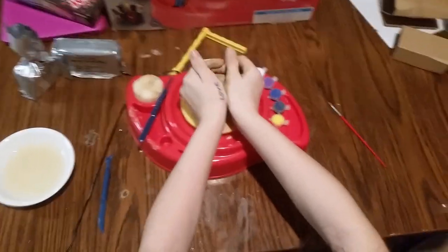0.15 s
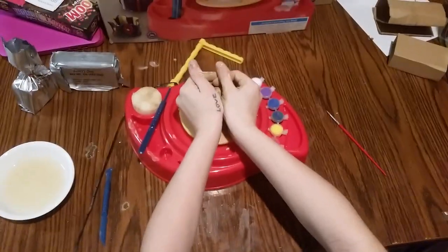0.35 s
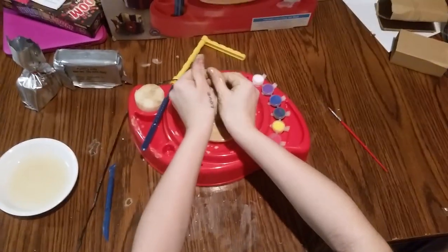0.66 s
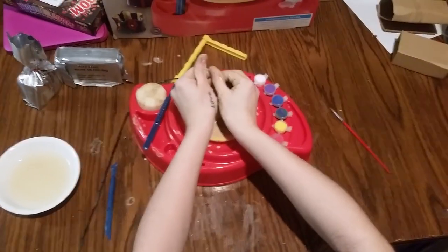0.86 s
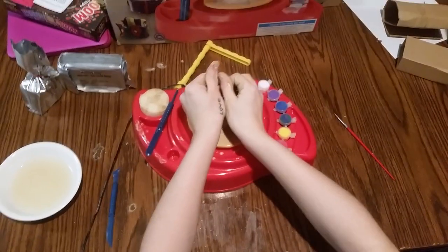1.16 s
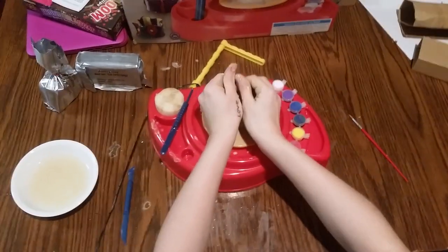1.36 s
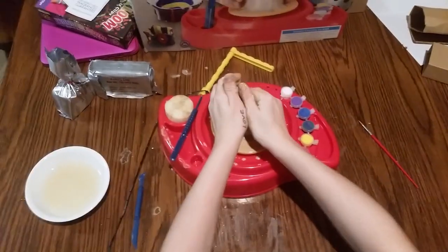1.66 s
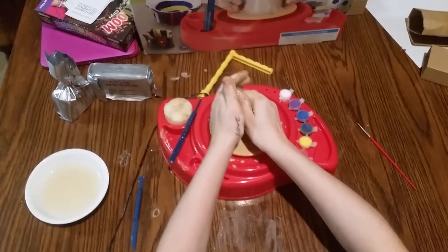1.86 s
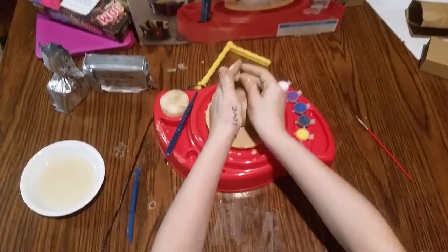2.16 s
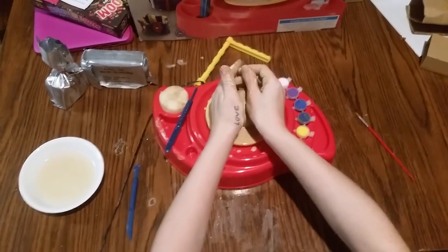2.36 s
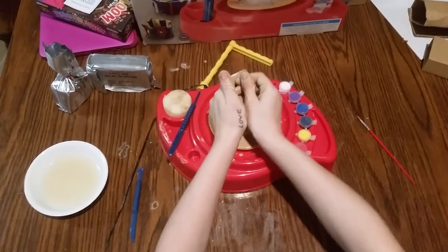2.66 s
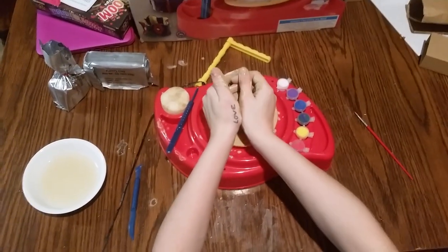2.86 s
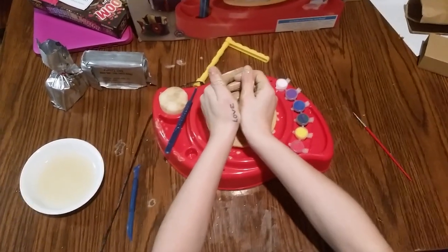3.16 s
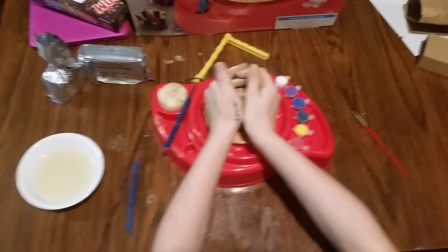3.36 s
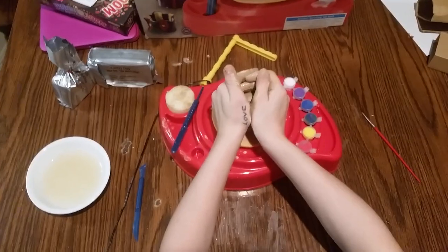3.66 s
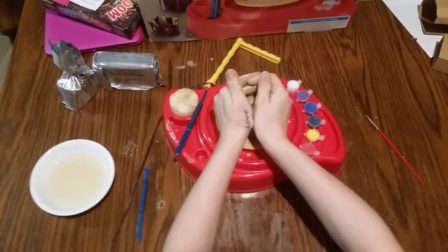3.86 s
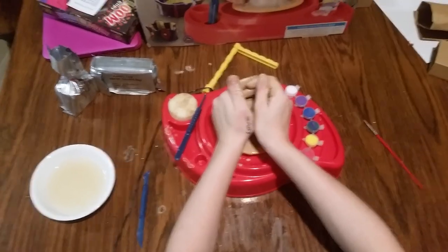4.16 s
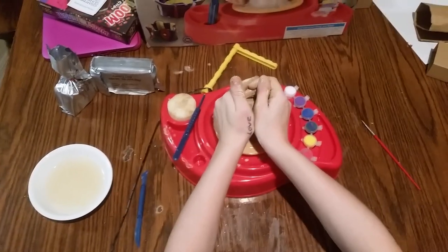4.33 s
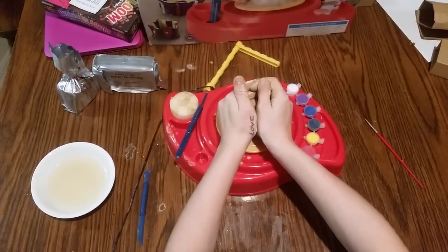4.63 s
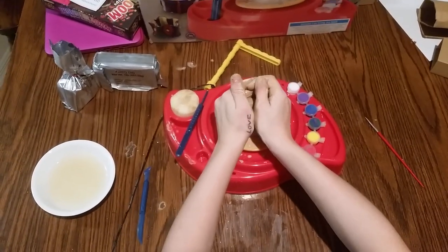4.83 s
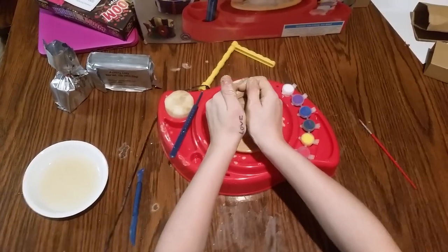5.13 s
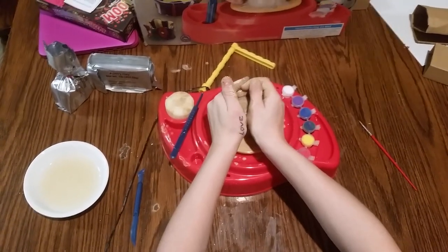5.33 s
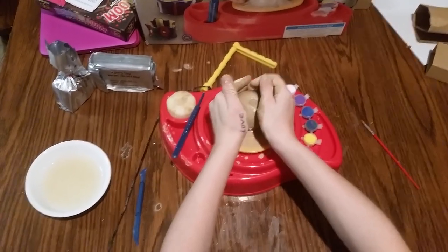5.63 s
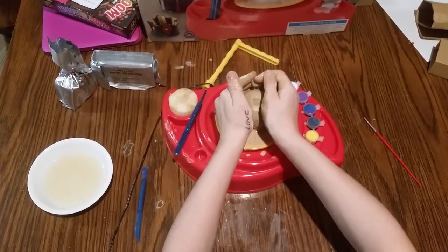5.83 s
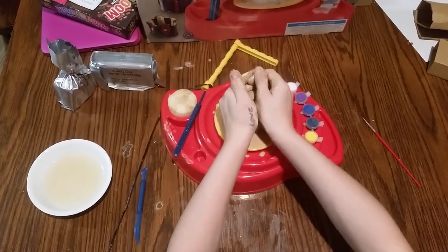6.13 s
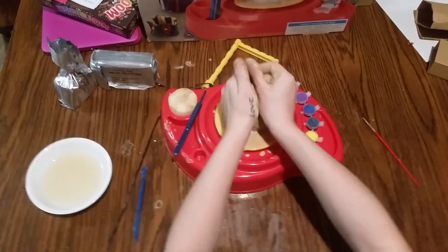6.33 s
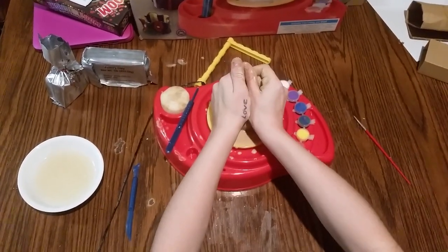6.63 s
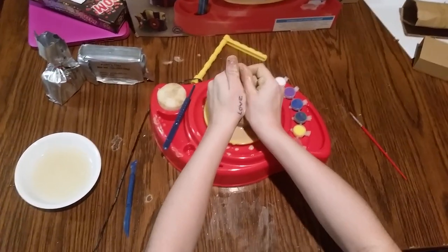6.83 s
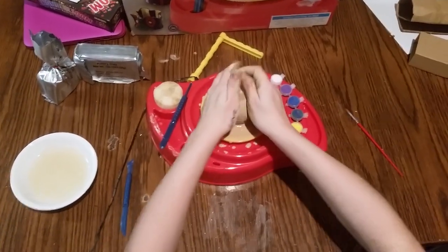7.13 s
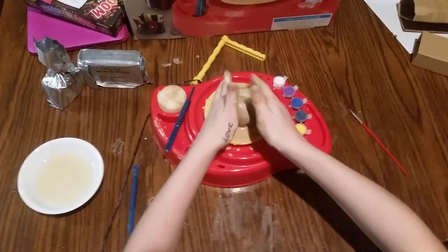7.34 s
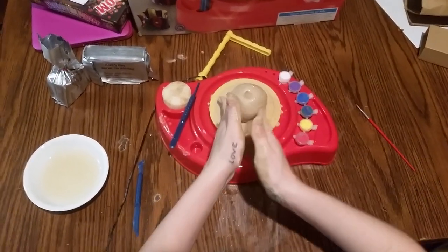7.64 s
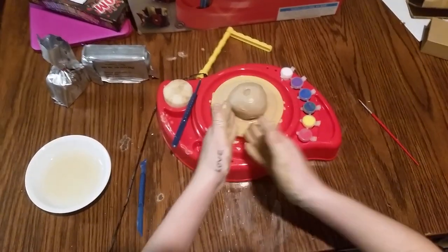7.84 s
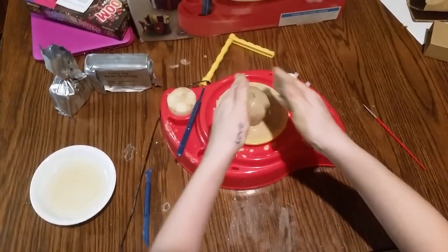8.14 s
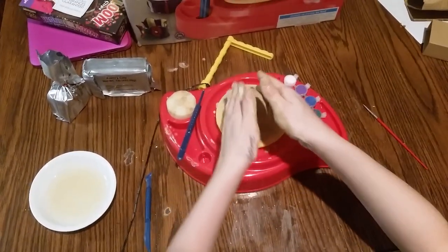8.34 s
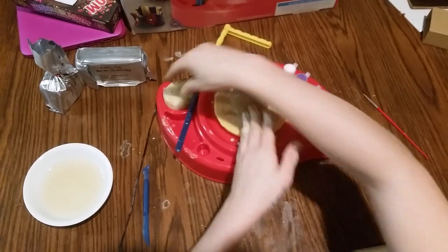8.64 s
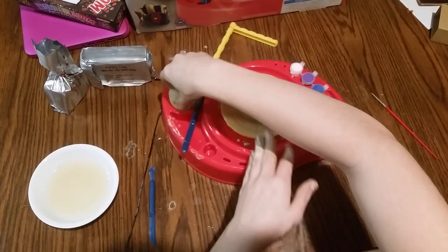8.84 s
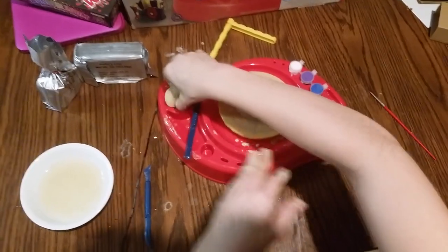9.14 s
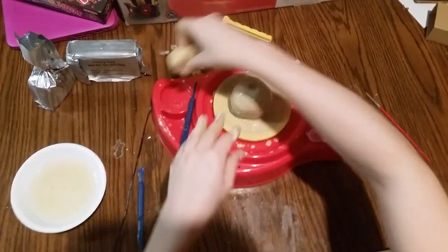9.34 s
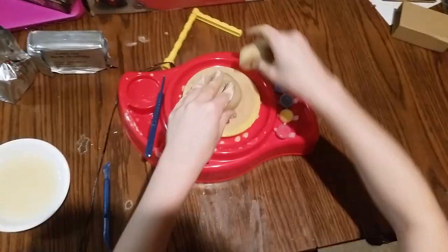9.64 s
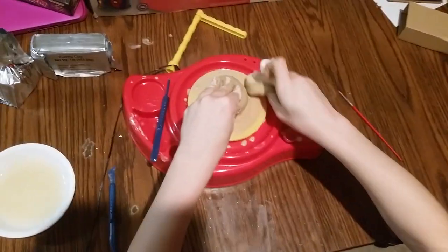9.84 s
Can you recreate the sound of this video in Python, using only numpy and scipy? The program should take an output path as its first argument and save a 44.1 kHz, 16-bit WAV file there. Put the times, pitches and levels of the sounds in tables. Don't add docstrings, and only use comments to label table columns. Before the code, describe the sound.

From 0 to 5.8 s a toy pottery wheel is already running: a thin, nasal whine around 1.5 to 1.6 kHz, drifting up and down as hands load it, with fainter overtones and a continuous grainy rattle of loose plastic teeth in a hollow housing. A soft handling thump comes near 0.07 s, weaker ones at 0.5, 1.6 and 2.9 s. At 5.8 s the motor lets go and the pitch falls with a chatter, stopping by 6.0 s. Low room hum remains. From 6.2 to 7.4 s come soft, damped clay taps and faint wet sliding. At 7.66 s the motor jerks on, whines until 8.15 s, and runs down by 8.35 s. After a quiet pause, small knocks start at 9.0 s, with two loud hard plastic knocks at 9.3 and 9.4 s, lighter clicks and rubbing to 10 s. Close, dry stereo with short room echo, whine leaning left.

```python
import sys
import numpy as np
from scipy import signal
from scipy.fft import rfft, irfft, next_fast_len
from scipy.io import wavfile
from scipy.ndimage import map_coordinates

SR = 44100
rng = np.random.default_rng(int(sys.argv[2]) if len(sys.argv) > 2 else 0)


def boost(x):
    u = np.asarray(x, float) / 20
    return 10 ** u


def unload_audio(sound):
    columns = np.transpose(np.atleast_2d(sound))
    steps = np.round(np.clip(columns, -1, 1) * 32767)
    wavfile.write(sys.argv[1], SR, steps.astype(np.int16))


N = 440559


def unit(x):
    return x / np.sqrt(np.mean(x ** 2) + 1e-20)


def along(points, hz):
    f, v = np.transpose(points)
    return np.interp(np.log(hz + 1), np.log(f + 1), v)


def curves(rows):
    s, *cols = np.transpose(rows)
    return [np.interp(np.arange(N) / SR, s, c) for c in cols]


def wobble(rate):
    coarse = np.arange(0, N + 16, 16)
    knots = rng.standard_normal(int(N * rate / SR) + 5)
    return np.interp(np.arange(N), coarse, map_coordinates(knots, [coarse * rate / SR]))


def filtered(x, response):
    m = next_fast_len(N + SR // 2)
    return irfft(rfft(x, m) * response(np.fft.rfftfreq(m, 1 / SR)), m)[..., :N]


def modes(table):
    def response(f):
        total = 0
        for k, (centre, width, db) in enumerate(table):
            damping = 1j * f * width
            total = total + (-1) ** k * boost(db) * damping / (centre * centre - f * f + damping)
        return total
    return response


def sides(pan_db):
    gains = boost(np.array([pan_db / 2, -pan_db / 2]))
    return gains / np.sqrt(np.mean(gains ** 2, axis=0))


def ports(pair, alike, lead):
    def mix(hz):
        share = np.clip(along(alike, hz), 0, .99)
        return np.array([share * np.exp(-1j * along(lead, hz)), np.sqrt(1 - share ** 2)])
    right = filtered(pair, mix).sum(axis=0)
    return np.array([pair[0], right])


def active(spans, fade_s=.011):
    t = np.arange(N) / SR
    return sum(np.clip((t - span[0]) / 0.0015, 0, 1) * np.clip((span[-1] - t) / fade_s, 0, 1)
               for span in spans)


# pressed t/s, released t/s, braking time/s at the first slope, standstill t/s
PEDAL = [
    (-0.5, 5.822, .143, 6.0),
    (7.664, 8.155, .164, 8.34),
]
SPIN_UP_S, STALL_PULL, KICK = .04, 1.12, .15
CRAWL, BRAKE_BEND = .25, .18
LOOSEN_S = 0.06


def pedal():
    t = np.arange(N) / SR
    share, coasting, tight = np.full(N, CRAWL), np.zeros(N), np.zeros(N)
    for pressed, released, brake_s, _ in PEDAL:
        since = np.clip(t - pressed, 0, None)
        rise = np.minimum(STALL_PULL - (STALL_PULL - KICK) * np.exp(-since / SPIN_UP_S), 1)
        braked = np.clip((t - released) / brake_s, 0, 1)
        fall = np.maximum(1 - braked + BRAKE_BEND * braked ** 2, CRAWL)
        share = np.where(t > pressed, rise * fall, share)
        coasting = np.where(t > pressed, np.clip((t - released) / 0.021, 0, 1), coasting)
        tight = np.where(t > pressed, np.exp(-since / LOOSEN_S), tight)
    return share, coasting, tight


def turning():
    return active([(pressed, still) for pressed, _, _, still in PEDAL], fade_s=.04) ** 2


def slack_gear(coasting, shaft_hz):
    return coasting * np.clip(1 - shaft_hz / 150, 0, 1)


# t/s, tooth mesh f/Hz
SPEED = [(0, 1567), (.2, 1510), (.35, 1508), (.6, 1645), (1.05, 1570), (1.4, 1597), (1.53, 1632),
         (1.9, 1543), (2.38, 1608), (2.76, 1579), (2.82, 1531), (3.23, 1522), (3.55, 1598), (3.72, 1532),
         (5.3, 1510), (5.58, 1546), (5.8, 1514), (7.7, 1526)]
# t/s, tooth load level/dB, rattle past the hands level/dB, bite sharpness level/dB
EFFORT = [(0, -19.5, -28.5, -22.5), (.3, -18.5, -30.5, -20), (.38, -17.5, -30.5, -24.5),
          (.46, -16.5, -28.5, -30), (.6, -17.5, -27.5, -30.5), (.8, -17, -28, -39), (.92, -18, -28, -29),
          (1.9, -16, -27, -28.5), (2.15, -18, -24.5, -25), (2.5, -15, -24.5, -23), (2.9, -20.5, -26, -23.5),
          (3.3, -17, -25, -22.5), (4.0, -19.5, -25.5, -21), (4.4, -16, -25, -29), (4.65, -15.5, -25.5, -22),
          (4.95, -26, -27, -25.5), (5.2, -17, -25.5, -27.5), (5.6, -14.5, -25, -25),
          (5.8, -17.5, -25.5, -20), (7.7, -18.5, -27.5, -24), (7.84, -17.5, -27.5, -26.5),
          (7.95, -17.5, -26.5, -28), (8.12, -17.5, -25.5, -33)]
# t/s, left-right level/dB
PHONE = [(0, 10.5), (.2, 15.5), (.65, 13), (1.0, 4), (2.0, 6.5), (5.9, 6), (7.7, 12.5), (7.8, 20),
         (8.3, 17.5)]
# turns of the shaft, level/dB under the mesh
ORDERS = [(2, -31.5), (2.5, -33.5), (3, -46), (6.3, -33), (7, -29.5), (9, -11), (11, -22.5), (19.7, -21.5),
          (30, -26.5), (40, -32)]
# f/Hz, level/dB
GLIDE = [(350, -4), (520, -9), (680, -8), (900, -3), (1170, 2), (1330, -6), (1780, -9), (2300, 2),
         (2750, -2), (3800, -3)]
MESH_LAW, OCTAVE_LAW = 0.7, 0.24


def gear_whine():
    share, coasting, tight = pedal()
    speed_db = 20 * np.log10(share)
    load_db, _, bite_db = curves(EFFORT)
    pan_db, = curves(PHONE)
    loaded_hz, = curves(SPEED)
    away_db = pan_db - 5.0
    shaft_hz = loaded_hz * share / 10
    slack = slack_gear(coasting, shaft_hz)

    chatter = coasting * np.sqrt(1 - share)
    mesh_db = load_db + MESH_LAW * speed_db + 3 * chatter * wobble(60)
    off_resonance_db = 0.07 * np.clip(loaded_hz - 1516, 0, 44.85)
    sticking_db = -14 * coasting * np.clip((.4 - share) / 0.27, 0, 1)
    octave_db = bite_db + 0.9 * coasting * (-24 - bite_db)
    octave_db += 3 * chatter * wobble(70) - off_resonance_db + OCTAVE_LAW * speed_db + sticking_db

    steady = 2 * np.pi * np.cumsum(shaft_hz) / SR
    turn = steady + 0.081 * wobble(14) + 0.032 * wobble(40) + 0.029 * wobble(150)
    turn += .1 * chatter * wobble(90)
    off_centre = 1 + 0.19 * np.sin(.19 * steady + 2 * wobble(8))
    off_centre += 0.12 * np.sin(.42 * steady + wobble(8))
    detuned_db = 1.3 * np.clip(shaft_hz - 155.5, 0, 4)

    def glide_db(order):
        return np.clip((1 - share) / .06, 0, 1) * along(GLIDE, order * shaft_hz)

    def tone(order, db, lead):
        return np.sqrt(2) * boost(db) * np.sin(order * turn + np.array([[lead], [0]]))

    first_db = mesh_db - .3 + glide_db(10) + 1.2 * wobble(30) + .7 * wobble(120)
    whine = off_centre * tone(10, first_db, lead=-1.2) * sides(pan_db)
    second_db = octave_db - 0.5 + glide_db(20) - detuned_db + 2.0 * wobble(40) + 1.5 * wobble(4.3)
    whine += tone(20, second_db, lead=0.67) * sides(3 + 1.1 * away_db)

    slow_db = 0.2 * np.clip(loaded_hz - 1567, -90, 0)
    for order, db in ORDERS:
        order_db = mesh_db + db + .6 * order * slack + glide_db(order) + 3 * wobble(25)
        if order in (9, 11):
            order_db += slow_db
        if order > 19:
            order_db -= detuned_db + 12 * tight
        if order == 30:
            order_db += (1 - coasting) * (bite_db + 23.5)
        whine += tone(order, order_db, lead=-0.5) * sides(0.69 * pan_db)
    return turning() * whine


SWAY_DB, SWAY_HZ, SWAY_S = 2.12, 301.7, 0.4975
SWAY_FROM_HZ = 4100


def swayed(x):
    hz, t, z = signal.stft(x, SR, nperseg=512)
    knots = rng.standard_normal((2, 120, 60))
    at = np.meshgrid(np.clip(hz / SWAY_HZ, 0, 118), np.clip(t / SWAY_S, 0, 58), indexing="ij")
    both = (knots[0], 0.54 * knots[0] + .8 * knots[1])
    field = np.array([map_coordinates(k, at) for k in both])
    depth_db = SWAY_DB * np.clip(hz / SWAY_FROM_HZ, 0, 1)[:, None]
    return signal.istft(z * boost(depth_db * field), SR, nperseg=512)[1][:, :N]


# f/Hz, level/dB per Hz
HOUSING = [(59, -59.5), (100, -28.5), (233, -32.5), (386, -19), (697, -19.5), (1310, -8.5), (1520, -2),
           (1880, -12), (2750, -8), (5170, -15.5), (7560, -12.5), (9740, -20), (12600, -12), (14500, -17),
           (15500, -63)]
# f/Hz, width/Hz, level/dB
SHELL = [(866, 110, -0.5), (2590, 210, -6.5), (4730, 200, -12.5), (6200, 440, -9.5), (7680, 250, -1.5),
         (9440, 240, -1.5), (12600, 660, -1.5)]
# f/Hz, share 0-1
ALIKE = [(100, 0.86), (600, 0.93), (1500, 0.38), (3000, 1), (5000, 0.18), (15000, 0.27)]
# f/Hz, angle/rad
LEAD = [(0, 2.5), (950, -0.5), (1550, 1), (2330, 0.76), (3100, 1.5), (3700, 2), (5250, -8.5), (6630, -12),
        (8100, -14), (10700, -12.5), (11300, -17.5), (12400, -8.5), (13100, -9), (15400, 2.5)]
# f/Hz, left-right level/dB
TILT = [(60, -7.5), (110, -6.5), (200, 3.5), (380, 3), (700, 1), (1290, 0.5), (2380, 1.5), (4400, 0.5),
        (8120, 11), (12400, -8), (14500, -8)]
# t/s, level/dB
CUP = [(0, 2.5), (.35, 3), (.55, 5), (.78, 3.5), (.9, -2.5), (1.8, 1), (2.1, 1), (2.9, 0), (3.2, -0.5),
       (3.6, 0.5), (5.8, -0.5), (7.7, -2.5), (7.9, 5.5), (8.1, 1.5)]
# f/Hz, width/Hz, level/dB
HOLLOW = [(2450, 800, -0.5)]
BODY_LAW, BUZZ_LAW, FIZZ_LAW = 1, 2.02, 1.9
COAST_DB, JERK_DB, LOOSEN_DB = 5.5, 6.5, -15
BODY_SHADE, FIZZ_SHADE = 0.07, 0.15
BUZZ_DB, BUZZ_GROWS = 4.5, 1.4


def housing_rattle():
    share, coasting, tight = pedal()
    speed_db = 20 * np.log10(share)
    _, loose_db, _ = curves(EFFORT)
    pan_db, = curves(PHONE)
    away_db = pan_db - 5.0
    slack = slack_gear(coasting, curves(SPEED)[0] * share / 10)

    body_db = loose_db - BODY_SHADE * away_db + BODY_LAW * speed_db + JERK_DB * tight + COAST_DB * coasting
    buzz_db = -26 + BUZZ_GROWS * (loose_db + 26) + BUZZ_DB + BUZZ_LAW * speed_db
    buzz_db += LOOSEN_DB * tight + COAST_DB * coasting
    fizz_db = loose_db - FIZZ_SHADE * away_db + FIZZ_LAW * speed_db

    bursts = boost(0.25 * wobble(20) + 0.7 * wobble(70) + 1.3 * wobble(400) + 3.5 * slack * wobble(90))
    teeth = ports(unit(bursts) * rng.standard_normal((2, N)), ALIKE, LEAD)

    def colour(hz):
        return boost(along(HOUSING, hz)) * (1 + np.abs(modes(SHELL)(hz))) * sides(along(TILT, hz))

    def above(hz, edge_hz):
        return 1 / (1 + (edge_hz / (hz + 1)) ** 8)

    low = filtered(teeth, lambda hz: colour(hz) * (1 - above(hz, 3710)))
    middle = filtered(teeth, lambda hz: colour(hz) * (above(hz, 3600) - above(hz, 8880)))
    high = filtered(teeth, lambda hz: colour(hz) * above(hz, 9040))
    body = boost(body_db + 4.0) * unit(low)
    body += (boost(curves(CUP)[0]) - 1) * filtered(body, lambda hz: np.abs(modes(HOLLOW)(hz)) ** 2)
    buzz = boost(buzz_db - 6.5) * unit(middle)
    fizz = boost(fizz_db + 2.5) * unit(high)
    return turning() * sides(0.34 * (pan_db - 4.0)) * swayed(body + buzz + fizz)


def contacts(events, body, dull_db, bright_db, thud_db, snap_db, soft_left, burst_s, soft_hz):
    dull, bright, snap, thuds = np.zeros((4, 2, N + SR))
    t = np.arange(SR // 10) / SR
    for s, db, brightness_db, pan_db, thud_hz in events:
        pan = sides(np.array([pan_db]))
        blow = boost(-60 * t / burst_s) * rng.standard_normal(len(t)) - 7 * (t == 0)
        blow = pan * blow / np.linalg.norm(blow)
        thud = boost(db + thud_db - 60 * t * thud_hz / 12) * np.sin(2 * np.pi * thud_hz * t)
        at = round((s + .0012) * SR)
        dull[:, at:][:, :len(t)] += boost(db + dull_db) * blow
        bright[:, at:][:, :len(t)] += boost(db + brightness_db + bright_db) * blow
        snap[:, at] -= boost(db + snap_db - soft_left * pan_db) * sides(pan_db)
        thuds[:, at:][:, :len(t)] -= pan * thud
    rung = filtered(dull[:, :N], modes(body[0])) + filtered(bright[:, :N], modes(body[1]))
    rung = filtered(rung, lambda hz: 1 / (1 + 1j * hz / soft_hz) ** 2)
    snap = filtered(snap[:, :N], lambda hz: 1 / (1 + 1j * hz / 2800) ** 4)
    return rung + snap + thuds[:, :N]


# t/s, peak level/dB, brightness level/dB, left-right level/dB, thud f/Hz
TAPS = [(6.162, -44, -2, 5, 1050), (6.31, -29, -10.5, 6.5, 715), (6.499, -47, -8, 6.5, 630),
        (6.527, -46, -12, 2.0, 603), (6.579, -31, -13, 2.0, 730), (6.585, -29.5, -15, 5, 720),
        (6.612, -34.5, -10, 6, 802), (6.685, -36, -13, 3, 800), (6.749, -31.5, -14, 3, 799),
        (6.782, -30.5, -12.5, 6, 708), (6.895, -33.5, -21, 2.5, 800), (7.105, -34.5, -29.5, 5, 770),
        (7.138, -38.5, -27, 3.0, 784), (7.286, -45, -26, 1, 627), (7.4, -32, -12.5, 6.5, 806)]
# f/Hz, width/Hz, level/dB
CLAY = [(255, 170, -12), (760, 50, 3), (850, 86, -4.5), (1070, 110, -3)], [(1510, 330, -1), (2320, 220, 8),
        (3850, 500, -12)]


def clay_taps():
    return contacts(TAPS, CLAY, dull_db=32.5, bright_db=35.0, thud_db=2.0, snap_db=-15, soft_left=.01,
                    burst_s=0.06, soft_hz=2300)


# t/s, peak level/dB, brightness level/dB, left-right level/dB, thud f/Hz
KNOCKS = [(8.971, -43, -17, 2, 240), (9.0125, -28, -22, -7, 171), (9.101, -37, -13, 5, 197),
          (9.249, -51, 3, 3.5, 215), (9.275, -33, -10, 11, 196), (9.3073, -12.5, -2.5, 9, 530),
          (9.380, -12.5, -7.5, -9, 395), (9.405, -20, -6.5, 2, 237), (9.522, -37, -2, -6, 277),
          (9.533, -29, -1, -13, 277), (9.555, -30, -9, 11, 242), (9.664, -39, -2, 16, 228),
          (9.970, -42.5, -13, 3, 229.4)]
# f/Hz, width/Hz, level/dB
TRAY = [(129.4, 60, -5), (403, 27, 4.5), (506, 72, 1.5), (900, 170, -3)], [(1290, 350, 5), (2150, 380, 5),
        (2900, 500, -6.5), (3670, 340, -4), (5300, 1500, -11.5), (7060, 900, -7.5)]


def tool_knocks():
    return contacts(KNOCKS, TRAY, dull_db=28.0, bright_db=23.5, thud_db=-7.0, snap_db=5.0, soft_left=0.65,
                    burst_s=0.018, soft_hz=4800)


# t/s, peak level/dB, left-right level/dB
TICKS = [
    (6.3106, -48, -4.0),
    (6.5844, -53, -3.5),
    (6.5934, -54, -1.0),
    (6.7825, -55, -2.5),
    (7.3622, -53, -6.0),
    (7.5647, -58, 0.5),
    (9.3087, -32, 9.0),
    (9.3801, -37, -7.0),
    (9.4055, -49, -0.5),
    (9.5327, -48, -13),
]
CRACK = [(1500, -20), (3500, 0), (7000, -1), (9500, -10), (12500, 0), (14500, -3)], .006


def ticks():
    colour, t60_s = CRACK
    out, t = np.zeros((2, N + SR)), np.arange(SR // 50) / SR
    for s, db, pan_db in TICKS:
        crack = boost(db - 60 * t / t60_s) * rng.standard_normal(len(t))
        out[:, round(s * SR):][:, :len(t)] += sides(np.array([pan_db])) * crack
    return filtered(out[:, :N], lambda hz: boost(along(colour, hz)))


# start t/s, firmest t/s, end t/s, level/dB
SCRAPE = [
    (6.45, 6.595, 7.7, -67.5),
    (9.09, 9.173, 10, -62),
    (9.24, 9.255, 9.3, -51),
    (9.43, 9.6, 9.8, -64),
]
# f/Hz, width/Hz, level/dB
SPONGE = [(1200, 700, -6), (2200, 570, 0.5), (3800, 550, -3), (5600, 700, -10), (7000, 900, -14)]
# f/Hz, share 0-1
AIR_ALIKE = [(60, 0.95), (240, 0.27), (950, 0.44), (3770, 0.12), (15000, 0.01)]
SCRAPE_EDGE_DB = -18


def scrape():
    grit = boost(2.5 * wobble(150))
    grains = grit * ports(rng.standard_normal((2, N)), AIR_ALIKE, [(100, 0)])
    touch = []
    for start, firm, end, db in SCRAPE:
        touch += [(start, db + SCRAPE_EDGE_DB), (firm, db), (end, db + SCRAPE_EDGE_DB)]
    rustle = unit(filtered(grains, lambda hz: modes(SPONGE)(hz) ** 2))
    return active([row[:3] for row in SCRAPE]) * boost(curves(touch)[0]) * rustle


# t/s, peak level/dB, left-right level/dB, push length/s
BUMPS = [
    (0.067, -13, 26, 0.00081),
    (0.533, -31.5, 18, 0.0017),
    (1.646, -25.5, 4, 0.0011),
    (2.889, -31.5, -2, 0.0014),
]


def bumps():
    out = np.zeros((2, N + SR))
    for s, db, pan_db, push_s in BUMPS:
        u = np.arange(SR // 20) / SR / push_s
        push = u * (2 - u) * np.exp(-u)
        out[:, round(s * SR):][:, :len(u)] += boost(db + 8.5) * sides(np.array([pan_db])) * push
    return out[:, :N]


# f/Hz, time to fall 60 dB (s)
ROOM = [(200, 0.17), (1000, 0.37), (4000, 0.35), (12000, 0.31)]


def room(x):
    hz, t, z = signal.stft(rng.standard_normal((2, SR // 2)), SR, nperseg=256)
    tail = signal.istft(z * boost(-60 * t / along(ROOM, hz)[:, None]), SR, nperseg=256)[1]
    later = np.pad(x, ((0, 0), (200, 0)))
    return signal.fftconvolve(later, tail / np.linalg.norm(tail[0]), axes=1)[:, :N]


# t/s, room level/dB
FLOOR = [(0, -50), (5.9, -48), (6.2, -49), (6.6, -47), (7, -49), (7.6, -49), (8, -56.5), (8.5, -50.5),
         (8.9, -56.5), (9.2, -48.5), (9.5, -48), (9.99, -51)]
# f/Hz, level/dB per Hz
AIR = [(15, -30), (25, -12.5), (59, -14), (108, -3.5), (165, -7.5), (229, -4), (306, -18.5), (399, -11.5),
       (991, -29.5), (3140, -45.5), (3670, -41), (5000, -55), (6500, -89), (11000, -120)]
# f/Hz, level/dB over the floor
HUM = [(59.5, -10.5), (102.3, -12), (119.5, -3.5), (204.6, -9), (241, -5), (321, -12.5), (412, -15.5)]
# f/Hz, level/dB per Hz
HISS = [(1760, -49.5), (3000, -21), (3560, -6.5), (4090, -6.5), (5570, -23), (5800, -27.5), (6940, -6.5),
        (7480, -12.5), (10800, -23.5), (11500, -9.5), (12400, -3.5), (14600, -12), (15500, -29)]
HISS_DB, HISS_GROWS = -73.5, 1.6


def background():
    t = np.arange(N) / SR
    room_db, = curves(FLOOR)
    hiss_db = HISS_DB + HISS_GROWS * (room_db + 50.0)
    air = ports(rng.standard_normal((2, N)), AIR_ALIKE, [(100, 0.0028)])
    air = boost(1.5 * wobble(5.4) + 2.0) * unit(filtered(air, lambda hz: boost(along(AIR, hz))))
    hum = np.zeros(N)
    for hz, db in HUM:
        hum += boost(db + 2.0 + 0.66 * wobble(2.0)) * np.sin(2 * np.pi * hz * t + .2 * wobble(3))
    hiss = unit(filtered(rng.standard_normal((2, N)), lambda hz: boost(along(HISS, hz))))
    return boost(room_db) * (air + hum) + boost(hiss_db + 1.5 * wobble(5.5)) * hiss


def scene():
    whine, rattle = gear_whine(), housing_rattle()
    taps, knocks = clay_taps(), tool_knocks()
    far = boost(-19) * whine + boost(-5.0) * rattle + boost(-6.5) * (taps + knocks)
    near = whine + rattle + taps + knocks + ticks() + scrape() + bumps()
    return near + room(far) + background()


# f/Hz, width/Hz, level/dB
RIGHT_DIPS = [(7250, 300, -4), (8700, 360, -11), (9750, 200, -5)]
TOP_HZ = 14620


def treble_by_side(hz):
    dip_db = sum(db * np.exp(-((hz - centre) / width) ** 2) for centre, width, db in RIGHT_DIPS)
    return boost(np.array([0 * hz, dip_db]) - np.clip(hz - TOP_HZ, 0, 600) * .13)


# f/Hz, level/dB under the whole frame
STARVE = [(40, -33), (130, -33.5), (220, -31), (300, -36), (700, -35), (800, -79.5)]
# f/Hz, level/dB
STARVE_HIGH = [(3900, -70), (4200, -35), (5300, -36), (6500, -37.5), (10300, -37.5), (11200, -40),
               (14500, -43)]
# f/Hz, level/dB
QUIET_DROP = [(5000, -130), (5500, -104), (6200, -104), (6600, -130), (7800, -130), (8200, -102),
              (11000, -102), (11600, -130)]
LOUD_FRAME_DB = -32


def starved(x):
    hz, _, z = signal.stft(x, SR, "cosine", nperseg=2048)
    hz = hz[:1024]
    power = np.abs(z) ** 2
    frame = power.sum(axis=1, keepdims=True)
    bands = power[:, :1024].reshape(2, 256, 4, -1).sum(axis=2)
    bands = np.repeat(bands, 4, axis=1)
    high_db = np.where(frame > boost(2 * LOUD_FRAME_DB), along(STARVE_HIGH, hz)[:, None], -99)
    least_db = np.maximum(along(STARVE, hz)[:, None], high_db)
    margin_db = 10 * np.log10(bands / frame + 1e-12) - least_db
    quiet_margin_db = 10 * np.log10(bands + 1e-20) - along(QUIET_DROP, hz)[:, None]
    margin_db = np.minimum(margin_db, quiet_margin_db)
    kept = 1 / (1 + np.exp(np.clip(-margin_db / 0.43, -30, 30)))
    kept = np.pad(kept, ((0, 0), (0, 1), (0, 0)))
    return signal.istft(z * kept, SR, "cosine", nperseg=2048)[1][:, :N]


def roll_off(x):
    return signal.sosfilt(signal.butter(12, 15830, fs=SR, output="sos"), x)


def record(dry):
    ceiling = .93
    rounded = dry / (1 + np.abs(dry / ceiling) ** 6) ** (1 / 6)
    mix = starved(filtered(rounded, treble_by_side))
    return roll_off(mix)


dry = scene()
out = record(dry)
unload_audio(out)
```